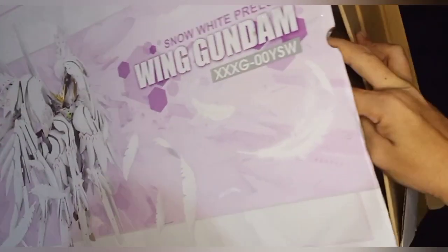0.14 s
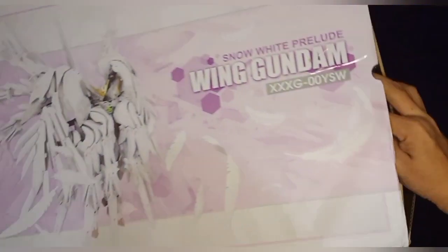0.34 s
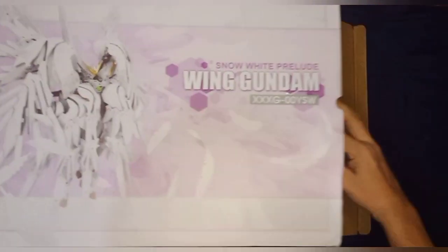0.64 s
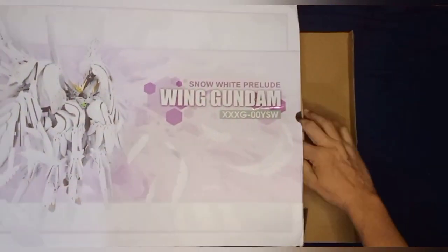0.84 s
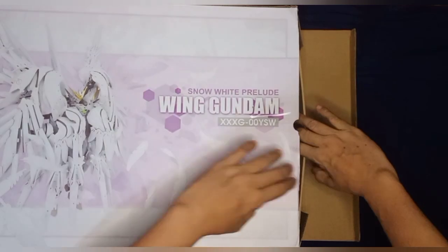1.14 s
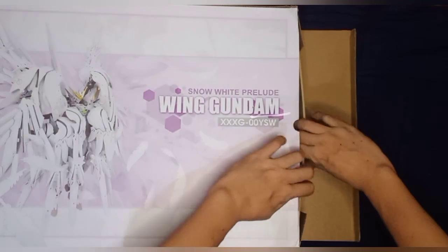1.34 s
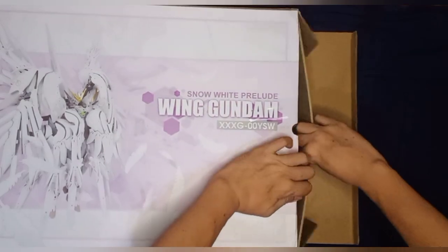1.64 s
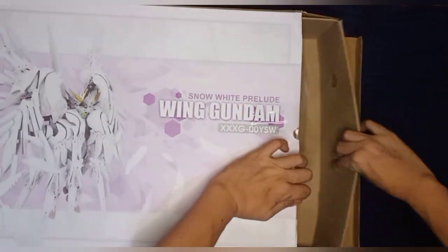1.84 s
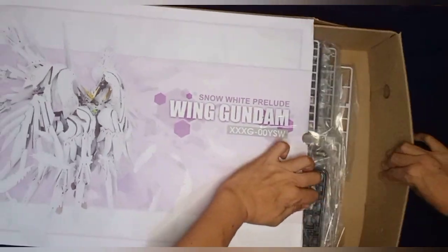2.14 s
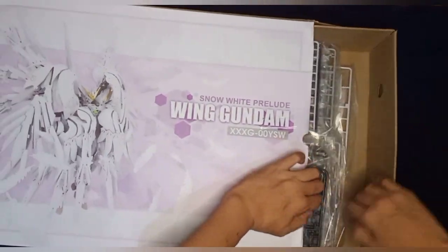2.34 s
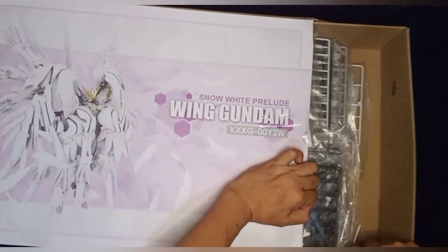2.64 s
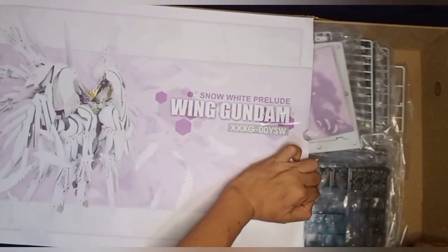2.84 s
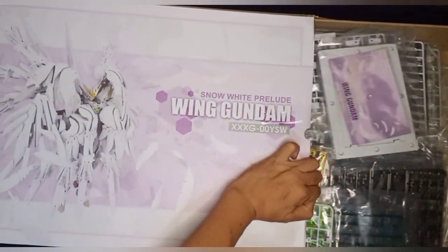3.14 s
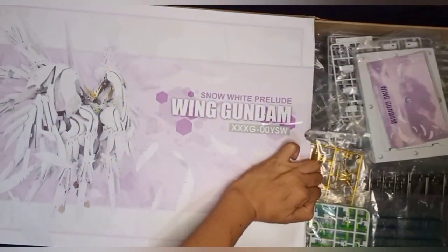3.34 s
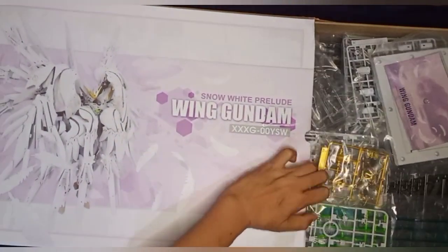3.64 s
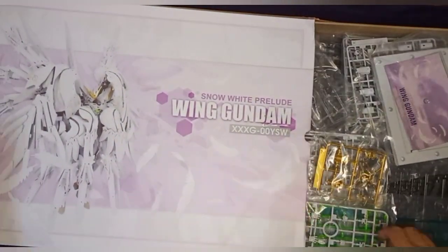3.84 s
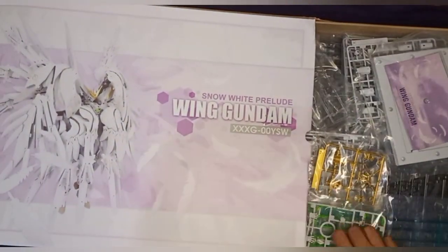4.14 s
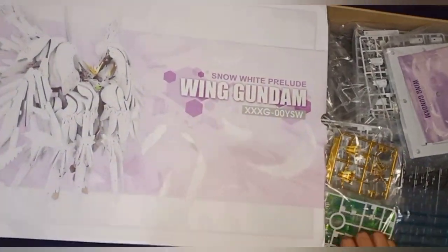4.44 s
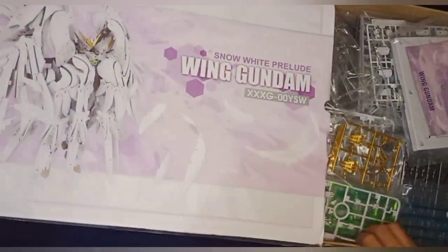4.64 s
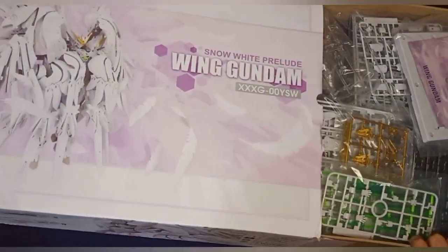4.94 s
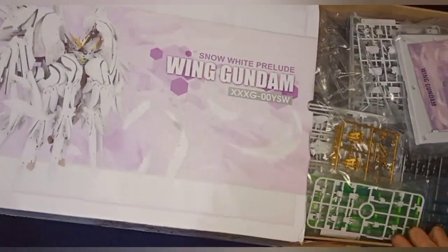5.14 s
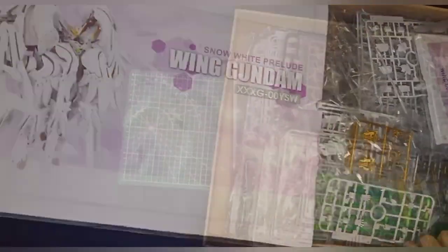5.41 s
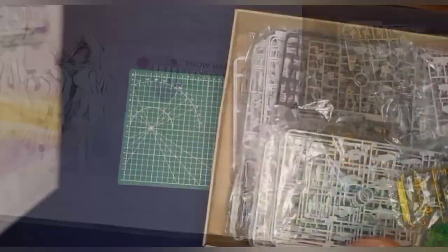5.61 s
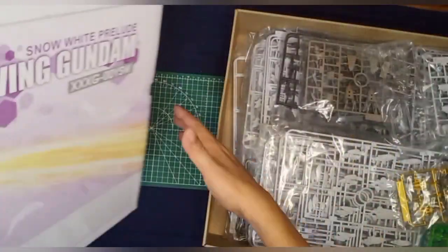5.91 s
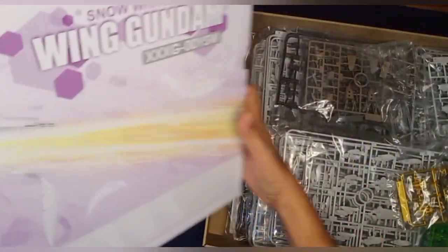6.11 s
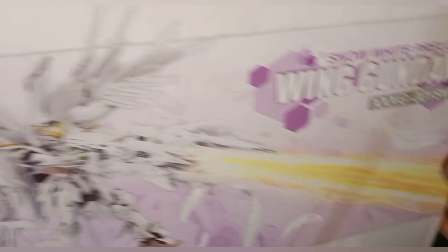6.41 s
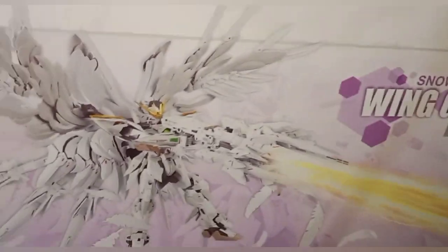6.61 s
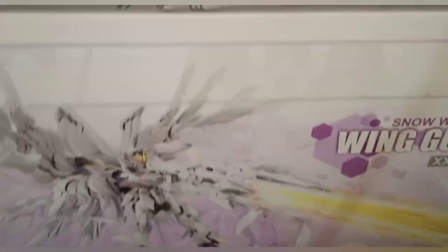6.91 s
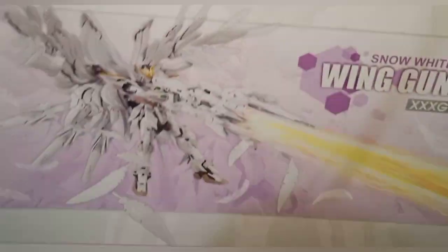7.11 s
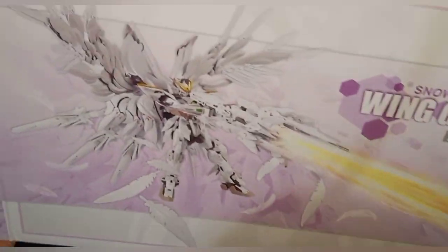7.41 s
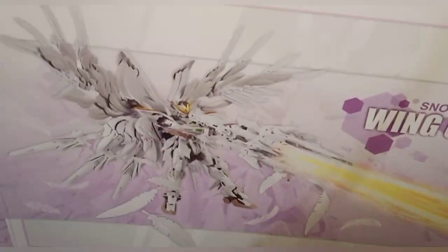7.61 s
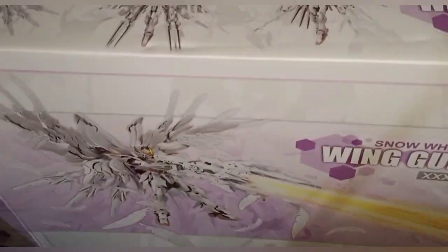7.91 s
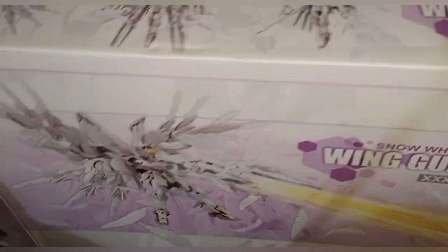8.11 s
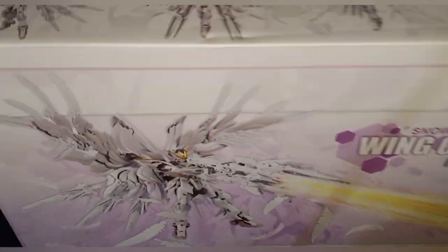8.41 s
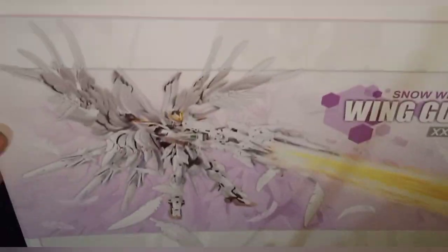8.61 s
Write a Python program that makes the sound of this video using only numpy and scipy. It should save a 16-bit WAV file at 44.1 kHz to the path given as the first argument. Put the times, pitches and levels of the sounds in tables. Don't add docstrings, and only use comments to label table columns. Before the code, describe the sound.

A close, dry indoor recording with wide, airy stereo hiss and a faint low mains hum that swells with each movement. From 0 to 1.6 s fingers rub a cardboard flap in short soft strokes, with light knocks near 0.2 s, a dry tick at 0.3 and a small thump near 0.8. A long scraping slide runs from 1.6 to 2.3, strongest early; small box bumps follow, then a steadier, longer drag from 2.6 to 3.5. A sharp knock at 3.7 starts the bag handling: thin, bright crackles and snaps, densest from 4.2 to 4.9. Sparse light rustles continue to 5.8, with a dull thump at 5.6. From 6.05 the sleeve is lifted with scuffs and hollow knocks at 6.2, 6.4 and 6.8. Softer turning rubs lead to the heaviest cluster of thumps at 7.75 to 7.9, and final knocks and a thump around 8.45, then fading brushes.

```python
import sys
import numpy as np
from scipy import signal
from scipy.fft import rfft, irfft, next_fast_len
from scipy.io import wavfile
from scipy.ndimage import uniform_filter1d, map_coordinates

SR = 44100
rng = np.random.default_rng(int(sys.argv[2]) if len(sys.argv) > 2 else 0)


def transcribe(signal):
    frames = np.atleast_2d(signal).T
    limited = np.clip(frames, -1, 1)
    pcm = np.round(limited * 32767).astype(np.int16)
    wavfile.write(sys.argv[1], SR, pcm)


def gain_from_db(level_db):
    decades = np.asarray(level_db, float) / 20
    return 10 ** decades


N = 386316

# peak_s, rise_s, fall_s, hiss_db, edge_over_hiss_db
OPENING_STROKES = [(0.031, 0.064, 0.057, -49, -4.5), (0.118, 0.066, 0.12, -56, -0.5),
                   (.206, .06, 0.062, -46, 0.5), (.285, 0.21, 0.1, -64, 3), (.497, 0.0072, 0.2, -67, 4),
                   (0.654, 0.052, .15, -47.5, -8.5), (0.775, 0.056, 0.072, -57, 5.5),
                   (0.872, .02, 0.3, -60, -20), (0.946, 0.12, 0.12, -53, 0.5),
                   (1.137, 0.16, .025, -61.5, -9.5), (1.333, 0.033, 0.11, -55, -5),
                   (1.453, 0.015, 0.13, -60.5, 3.5), (1.501, .1, 0.063, -64.5, -2),
                   (1.571, 0.043, 0.047, -56, -4), (2.428, 0.042, 0.092, -57, 3.5),
                   (2.491, 0.025, 0.12, -55.5, -6), (2.545, 0.11, 0.022, -56, -6),
                   (1.055, .03, .05, -64, -2)]
# time_s, hiss_db, edge_over_hiss_db
TRAY_PULLS = [
    [(1.62, -99, 3), (1.645, -52.5, -1.5), (1.774, -39.5, -2), (1.836, -45.5, 2), (2.107, -49, 2),
     (2.123, -45, -0.5), (2.179, -58.5, 8.5), (2.25, -53, -8.5), (2.323, -100, 4)],
    [(2.56, -83.5, 5), (2.611, -46.5, -0.5), (3.073, -45, 5.5), (3.137, -47, 4), (3.289, -44, 4),
     (3.522, -54.5, 4.5), (3.576, -79, 3), (3.62, -100, 20)],
]
# peak_s, rise_s, fall_s, hiss_db, edge_over_hiss_db
BAG_STROKES = [(3.64, 0.16, 0.036, -77.5, -10), (3.655, 0.012, 0.094, -50, -29),
               (3.714, 0.1, 0.03, -49.5, -6.5), (3.999, 0.031, 0.17, -48.5, -25),
               (4.071, 0.12, 0.045, -48, -21), (4.189, 0.065, 0.26, -43.5, -15),
               (4.254, 0.14, 0.3, -43.5, -15), (4.397, 0.02, 0.04, -42, -39), (4.381, .008, .08, -47, -25),
               (4.432, 0.0086, 0.13, -48.5, -32), (4.478, 0.09, .052, -44.5, -17),
               (4.553, 0.01, 0.1, -47.5, -27), (4.53, .005, .1, -50, -30), (4.629, 0.0057, .045, -52, -42),
               (4.679, 0.01, 0.23, -41, -20), (4.655, .05, .1, -48, -35),
               (4.749, 0.11, 0.079, -41.5, -10.5), (4.862, 0.03, 0.075, -44.5, 1.5),
               (4.907, 0.031, 0.022, -48, -36), (5.168, 0.05, 0.1, -55, 3), (5.26, 0.2, .12, -59, -2),
               (5.303, 0.008, 0.12, -53.5, -12), (5.415, 0.13, 0.12, -57.5, 4),
               (5.442, 0.27, 0.13, -59.5, -4), (5.618, 0.044, 0.21, -63.5, 5.5),
               (5.677, 0.13, 0.029, -64, -2), (5.795, 0.1, 0.039, -62.5, -12), (4.595, .04, .03, -52, -15),
               (5.205, .015, .1, -58, -15), (5.742, .07, .05, -64, 0), (5.497, .05, .04, -62, -20),
               (4.82, .03, .04, -54, -20)]
# peak_s, rise_s, fall_s, hiss_db, edge_over_hiss_db
SLEEVE_STROKES = [(6.066, .006, 0.11, -60, -1), (6.106, 0.027, 0.041, -62, 3.5),
                  (6.195, 0.054, .17, -40.5, -2), (6.379, 0.03, 0.09, -58, 1),
                  (6.585, 0.06, .06, -58, -10), (6.609, 0.075, 0.16, -50, -2.5),
                  (6.731, 0.38, .085, -58.5, -3.5), (6.796, 0.025, 0.14, -47, -5),
                  (6.822, 0.044, 0.064, -41.5, -4), (6.968, 0.13, 0.39, -61.5, -21),
                  (7.084, 0.072, 0.1, -45, 0), (7.301, 0.17, 0.6, -68.5, -36), (6.145, .03, .04, -62, 3),
                  (6.335, .02, .06, -60, 2), (6.47, .015, .05, -75, 6), (6.53, .03, .08, -62, -8),
                  (6.9, .06, .06, -62, -3),
                  (7.495, 0.03, 0.13, -58.5, -0.5), (7.647, 0.09, .065, -58, -3.5),
                   (7.689, 0.028, 0.2, -48.5, -1.5), (7.731, 0.065, 0.052, -49, -11),
                   (7.792, 0.03, 0.047, -46, 1.5), (7.859, 0.068, 0.11, -59, 10),
                   (7.95, 0.28, 0.09, -57.5, -3), (7.983, 0.036, 0.057, -45, -3),
                   (8.12, 0.04, 0.14, -57, 2), (8.08, .05, .15, -58, -30), (8.334, 0.08, 0.08, -49.5, -0.5),
                   (8.29, .025, .12, -53, 2), (8.24, .1, .1, -60, -20), (8.444, 0.03, 0.05, -50, 7),
                   (8.467, .02, .13, -51, 7), (8.42, .03, .05, -60, 0), (8.541, .08, 0.17, -50, -6.5),
                   (8.758, 0.15, .1, -52, -6), (8.69, .04, .2, -57, -4), (8.6, .08, .08, -57, -5),
                   (7.45, .02, .12, -66, -6)]
# start_s, peak_db, pitch_hz, length_s
TAUT_KNOCKS = [(.001, -45.5, 331, 0.073), (.193, -43.5, 275, .06), (0.198, -37, 1786, .032),
               (0.437, -63, 794, 0.022), (1.001, -40, 311, 0.022), (1.11, -54, 384, 0.035),
               (1.33, -47.5, 410, 0.024), (1.486, -51.5, 313, 0.033), (3.695, -27.5, 331.4, 0.038),
               (3.699, -31.5, 568, 0.014), (6.164, -36.5, 397.6, 0.13), (6.183, -28.5, 432, 0.056),
               (6.185, -36, 922, 0.052), (6.46, -44, 305, 0.021), (6.601, -40.5, 666, 0.042),
               (6.769, -36.5, 415, 0.018), (7.041, -42.5, 496, 0.053), (7.369, -43.5, 428, 0.031),
               (7.836, -25, 590, 0.013), (7.837, -37.5, 1126, 0.016), (8.296, -41, 489, 0.029),
               (8.437, -35, 292, 0.12), (8.437, -29.5, 660, .095), (8.4377, -28.5, 709, .095),
               (5.388, -53.5, 480, 0.084)]
# start_s, peak_db, pitch_hz, length_s
LOOSE_KNOCKS = [(0.251, -46.5, 296, 0.025), (0.506, -53, 273, .056), (0.767, -46, 292, 0.043),
                (.934, -49, 345, .041), (1.465, -45.5, 268, 0.018), (2.344, -45, 230, 0.087),
                (8.5, -37, 259, 0.043), (4.188, -49, 334, 0.08), (4.847, -53, 418, 0.054),
                (5.157, -60, 680, 0.032), (5.607, -45, 342, 0.04), (5.63, -40, 503, 0.043),
                (6.066, -57, 274, .074), (6.224, -35.5, 356, 0.057), (6.33, -39.5, 361, 0.023),
                (6.378, -50, 500, .03), (6.792, -43, 523, 0.033), (7.498, -44, 504, 0.078),
                (7.641, -43.5, 511, 0.043), (7.679, -48.5, 810, 0.062), (7.717, -37.5, 483, 0.026),
                (7.766, -31, 277, 0.034), (7.876, -28.5, 337, 0.037), (8.442, -40, 2100, .06)]
# start_s, level_db, pitch_hz, length_s
SINGING_FOLDS = [(.09, -58, 750, .06), (.2, -56, 4000, .02), (.62, -62, 1300, .06), (3.97, -69, 3500, .05),
                 (4.04, -60, 4300, .03), (4.175, -55, 3200, .05), (4.245, -52, 2900, .04),
                 (4.255, -55, 4200, .04), (4.335, -60, 2000, .03), (4.47, -56, 2600, .02),
                 (4.627, -54, 4000, .03), (4.72, -54, 3000, .06), (5.2, -56, 4000, .035),
                 (5.3, -60, 3000, .05), (5.48, -64, 3800, .03), (6.372, -56, 1400, .03),
                 (6.462, -68, 2000, .03), (6.525, -64, 2300, .04), (6.64, -58, 560, .08),
                 (6.88, -63, 1900, .05), (7.15, -63, 800, .08), (7.44, -68, 2100, .05),
                 (7.45, -67, 2650, .07), (7.715, -56, 2700, .04), (8.442, -50, 1700, .02),
                 (8.464, -50, 1800, .025), (8.464, -54, 3200, .02), (6.176, -44, 540, .09),
                 (5.155, -56, 2200, .04), (8.5, -46, 800, .05)]
# start_s, peak_db, dull_over_peak_db, left_over_right_db
CREASE_SNAPS = [(2.3382, -61, 18, 4), (3.66, -33, -25, 8), (4.1893, -33.5, -20, -2.5),
                (4.21, -35, -24.5, 4), (4.252, -25, -21, 0), (4.379, -36.5, -20, 7),
                (4.397, -36, -32, 11.5), (4.432, -36.5, -37, 2), (4.49, -37.5, -36, 3),
                (4.529, -31.5, -32, 6.5), (4.553, -29, -42, 5.5), (4.6279, -26, -51, -1),
                (4.6765, -30, -24, 4), (4.903, -29, -43, 6), (5.157, -47, 8, -3), (5.3004, -31, -19, -4),
                (6.0708, -48.5, -3, -5), (6.6044, -31, -10, -6.5), (4.0682, -36, -30, 1),
                (4.592, -43, -25, 5), (4.6578, -42, -35, 3), (4.8165, -46, -30, 3), (4.8449, -45, -10, 1),
                (5.4969, -52, -20, 1), (6.1935, -31, -5, -2), (6.3746, -50, 0, 4), (7.0491, -46, -8, 0),
                (7.8388, -46, 0, 0), (7.8722, -45, 0, 0), (8.4439, -40, -3, 0), (8.4658, -40, -3, -1),
                (.197, -42, -5, 2), (1.4501, -54, -8, 1), (1.6427, -48, -10, 5), (7.4955, -50, -8, -1),
                (7.6846, -47, -8, -2)]
# start_s, peak_db, dull_over_peak_db, left_over_right_db
EDGE_TICKS = [
    (.2975, -30, -1, 3),
    (.497, -40, 1, 10),
    (5.203, -42, -20, 0),
]
# start_s, peak_db,
# pitch_hz, length_s
THUMPS = [(0.2, -49, 120, 0.047), (0.519, -57, 216, 0.063), (0.767, -35, 119.5, 0.06),
          (2.356, -37.5, 198, 0.035), (2.415, -36, 190, 0.03), (2.252, -47.5, 218, 0.047),
          (5.609, -31, 131, 0.052), (5.639, -41, 104, 0.04), (7.533, -48.5, 180, 0.035),
          (7.768, -23, 140.5, 0.05), (7.799, -29, 120, 0.092), (7.874, -28.5, 206.5, 0.048),
          (7.919, -39.5, 116, 0.049), (8.337, -44.5, 111, 0.06), (8.499, -24, 131, 0.045),
          (6.373, -27, 300, .018), (7.878, -30, 520, .012), (3.7, -44, 90, .06), (5.133, -55, 125, .04),
          (6.229, -32, 420, .012), (7.79, -33, 250, .025)]
# pitch_hz, level_db (per hertz)
CARD_HISS = [(880, -52), (1500, -11), (1580, -15.5), (2640, -7.5), (2910, -8), (3660, -7), (5710, -9),
             (7840, 1), (11200, -8.5), (15100, -4), (16000, -4)]
# pitch_hz, level_db (per hertz)
BAG_FILM = [(900, -42), (1600, -17), (2600, -8), (3700, -6), (5600, -9.5), (7840, 1), (11200, -8),
            (16000, -4)]
# pitch_hz, level_db (per hertz)
EDGE_SCRAPE = [(410, -16), (700, -2.5), (745, -2), (956, -2), (1390, -5.5), (2690, -4.5), (4500, -10.5),
               (5850, -44), (9900, -120)]
# pitch_hz, width_hz, level_db
PANEL_MODES = [(120, 37, -11), (290, 32.4, 3.5), (415, 110, 0.5), (672, 150, -3), (794, 240, -13.5),
               (900, 56, -12.5)]
# pitch_hz, level_db (per hertz)
ROOM_AIR = [(25, -1.5), (64, 6), (185, -11.5), (900, -33), (2500, -23), (5000, -36.5), (9500, -37),
            (16000, -37.5)]
# pitch_hz, likeness (0 to 1)
LEFT_RIGHT_LIKENESS = [(30, .7), (60, 0.93), (130, 0.94), (290, 0.95), (640, 0.52), (1400, 0.22),
                       (3000, .01)]
# pitch_hz, left_over_right_db
PORT_BALANCE = [(200, 1), (700, -1.5), (4000, .5), (9000, -0.5), (15000, 6)]
# pitch_hz, decay_s
ROOM_DECAY = [(100, 0.053), (500, 0.12), (3000, 0.068), (12000, 0.21)]

HUM_HZ, TOP_HZ = 119.3, 15950
STROKE_DROP_DB, RISE_BEND, FALL_BEND = 29, 1.05, 1.03
DRONE_DB, DRONE_GROWS = -4, 0.99
DRONE_LAG_S, PULL_DRONE_DB = .04, 1.5
QUIET_DB = -91.5
GATE_DB, GATE_STEEP = -70.5, 1
FILM_START_S, FILM_END_S, FILM_DB = 3.62, 5.13, 1
TAUT_RATTLE, LOOSE_RATTLE = 0.25, 0.57
FOLD_WIDTH = .18
CRACK_S = .004
RUSTLE_DB, RUSTLE_S = -15, .03
TICK_RUSTLE_DB, TICK_RUSTLE_S = -30, .012
MORE_GAPS_S, MORE_GAPS_DB = 5.5, 4


def unit(x):
    return x / np.sqrt(np.mean(x ** 2) + 1e-20)


def along(points, hz):
    f, value = np.transpose(points)
    return np.interp(np.log(hz + 1), np.log(f + 1), value)


def wobble(rate):
    knots = rng.standard_normal(int(N * rate / SR) + 4)
    return map_coordinates(knots, [np.arange(N) * rate / SR])


def filtered(x, response):
    m = next_fast_len(N + SR // 2)
    return irfft(rfft(x, m) * response(np.fft.rfftfreq(m, 1 / SR)), m)[..., :N]


def strokes(t):
    rows = OPENING_STROKES + BAG_STROKES + SLEEVE_STROKES
    peak, rise, fall, peak_db, edge_db = np.transpose(rows)[:, :, None]
    grid = np.arange(0, N / SR, .001)
    away = np.abs(peak - grid)
    flank = np.where(grid < peak, (away / rise) ** RISE_BEND, (away / fall) ** FALL_BEND)
    stroke_db = peak_db - STROKE_DROP_DB * flank
    stroke_db = stroke_db - GATE_STEEP * np.clip(GATE_DB - stroke_db, 0, None)

    curves = [np.transpose(p) for p in TRAY_PULLS]
    pull_db = np.array([np.interp(grid, c[0], c[1], left=-200, right=-200) for c in curves])
    pull_edge_db = np.array([np.interp(grid, c[0], c[2], left=-200, right=-200) for c in curves])
    still = 0 * grid
    hiss_db = np.vstack([stroke_db, pull_db, QUIET_DB + still])
    edge_db = np.vstack([edge_db + still, pull_edge_db, still])
    load_db = np.vstack([0 * flank, PULL_DRONE_DB + 0 * pull_db, still])

    drone_db = hiss_db + DRONE_DB + load_db + DRONE_GROWS * edge_db
    layers = hiss_db, hiss_db + edge_db, drone_db
    hiss, edge, drone = [np.sum(gain_from_db(2 * db), axis=0) for db in layers]
    keep = np.exp(-.001 / DRONE_LAG_S)
    late = signal.lfilter([1 - keep], [1, -keep], drone, zi=drone[:1])[0]
    drone = np.minimum(drone, late)
    return [np.interp(t, grid, 10 * np.log10(power)) for power in (hiss, edge, drone)]


def pair(gain, grain_db, patchy_db):
    _, frame, z = signal.stft(rng.standard_normal((2, N)), SR, nperseg=512)
    field = uniform_filter1d(rng.standard_normal(z.shape[1:]), size=3, axis=0)
    field = uniform_filter1d(field, size=9, axis=1)
    firm_db = uniform_filter1d(strokes(frame)[0], size=28)
    streaks = unit(field) * np.clip((-48 - firm_db) / 12, .2, 1)
    noise = signal.istft(z * gain_from_db(patchy_db * streaks), nperseg=512)[1][:, :N]
    noise = noise * gain_from_db(grain_db * wobble(300))

    def spread(hz):
        turn = np.arccos(np.clip(along(LEFT_RIGHT_LIKENESS, hz), -1, 1)) / 2
        return gain(hz) * np.array([np.cos(turn), np.sin(turn)])

    mid, side = filtered(noise, spread)
    return unit(np.array([mid + side, mid - side]))


def background():
    t = np.arange(N) / SR
    opening = np.clip((strokes(t)[0] + 92) / 30, 0, 1)
    phase = 2 * np.pi * HUM_HZ * t + .5 * wobble(42)
    hum_db = -75.0 + 5.5 * opening + (2.0 + 3.0 * opening) * wobble(23)
    hum = gain_from_db(hum_db) * np.sqrt(2) * np.sin(phase)
    rumble = pair(lambda hz: (hz / 90) ** 2 / (1 + (hz / 110) ** 4), grain_db=3.5, patchy_db=3.5)
    air = pair(lambda hz: gain_from_db(along(ROOM_AIR, hz)), grain_db=-4.0, patchy_db=-2.5)
    return hum + gain_from_db(-99.5 + 28.2 * opening) * rumble + gain_from_db(-81.5) * air


def thud(t, length):
    rise = 1 - np.exp(-(t / (0.003 + 0.037 * length)) ** 2)
    return rise * gain_from_db(-9 * t / length - 17.4 * (t / length) ** 2)


def knocks():
    out, t = np.zeros(N + SR), np.arange(SR // 5) / SR
    f = np.fft.rfftfreq(len(t), 1 / SR)
    for rows, share in [(TAUT_KNOCKS, TAUT_RATTLE), (LOOSE_KNOCKS, LOOSE_RATTLE)]:
        for start, db, hz, length in rows:
            colour = f * hz / np.abs(hz * hz - f * f + .6j * f * hz) / (1 + (f / (3 * hz)) ** 2)
            rattle = unit(irfft(rfft(rng.standard_normal(len(t))) * colour, len(t)))
            blow = (1 - share) * np.sin(2 * np.pi * hz * t) + 1.105 * share * rattle
            out[round(start * SR):][:len(t)] += gain_from_db(db + 5.5) * blow * thud(t, np.clip(length, .008, .1))
    return out[:N]


def room(x):
    hz, t, z = signal.stft(rng.standard_normal((2, SR // 4)), SR, nperseg=256)
    decay = gain_from_db(-60 * t / along(ROOM_DECAY, hz)[:, None])
    tail = signal.istft(z * decay, SR, nperseg=256)[1]
    late = np.pad(x, (200, 0))[None]
    return signal.fftconvolve(late, tail / np.linalg.norm(tail[0]), axes=1)[:, :N]


def panel(f):
    total = 0
    for k, (centre, width, db) in enumerate(PANEL_MODES):
        total = total + (-1) ** k * gain_from_db(db) * 1j * f * width / (centre * centre - f * f + 1j * f * width)
    return total


def rubbing():
    t = np.arange(N) / SR
    hiss_db, edge_db, drone_db = strokes(t)
    on_film = (t > FILM_START_S) & (t < FILM_END_S)
    card = pair(lambda hz: gain_from_db(along(CARD_HISS, hz)), grain_db=1.5, patchy_db=3.0)
    film = pair(lambda hz: gain_from_db(along(BAG_FILM, hz)), grain_db=2.5, patchy_db=3.0)
    scrape = pair(lambda hz: gain_from_db(along(EDGE_SCRAPE, hz)), grain_db=1.1, patchy_db=4.5)
    drone = pair(panel, grain_db=4.2, patchy_db=5.0)
    hiss = gain_from_db(hiss_db + 3.0) * np.where(on_film, gain_from_db(FILM_DB) * film, card)
    return hiss + gain_from_db(edge_db) * scrape + gain_from_db(drone_db + 1.5) * drone


def folds():
    out, t = np.zeros((2, N + SR)), np.arange(SR // 5) / SR
    f = np.fft.rfftfreq(len(t), 1 / SR)
    for start, db, hz, length in SINGING_FOLDS:
        band = f * hz / np.abs(hz * hz - f * f + 1j * FOLD_WIDTH * f * hz)
        ring = unit(irfft(rfft(rng.standard_normal((2, len(t)))) * band ** 2, len(t)))
        ring = ring * thud(t, np.clip(length, .01, .12))
        out[:, round(start * SR):][:, :len(t)] += gain_from_db(db + 3) * ring
    return out[:, :N]


def snaps():
    out, t = np.zeros((2, N + SR)), np.arange(SR // 6) / SR
    f = np.fft.rfftfreq(len(t), 1 / SR)
    dull = (f / 700) ** 2 / (1 + (f / 700) ** 2) / (1 + (f / 2500) ** 4)
    lead, size = 64, SR // 8
    rows = [(*k, RUSTLE_DB, RUSTLE_S) for k in CREASE_SNAPS]
    rows += [(*k, TICK_RUSTLE_DB, TICK_RUSTLE_S) for k in EDGE_TICKS]
    for start, db, dull_db, pan_db, rustle_db, length in rows:
        stop = 11 * (t / np.clip(length, .01, .09)) ** 4
        burst = gain_from_db(-60 * t / CRACK_S) + gain_from_db(rustle_db - 6 * t / length - stop)
        noise = np.roll(rng.standard_normal((2, len(t))) * burst, lead, axis=1)
        own = gain_from_db(3.1 * unit(uniform_filter1d(rng.standard_normal(len(f)), size=70)))
        colour = own * (gain_from_db(along(BAG_FILM, f) + 8.5) + gain_from_db(dull_db + 14.0) * dull)
        crack = irfft(rfft(noise) * colour, len(t))[:, :size]
        level = gain_from_db(db - 8.5 + pan_db * np.array([[.5], [-.5]]))
        out[:, round(start * SR) - lead:][:, :size] += level * crack
    return out[:, :N]


def thumps():
    out, t = np.zeros(N + SR), np.arange(SR // 4) / SR
    for start, db, hz, length in THUMPS:
        turn = 2 * np.pi * hz * t
        bounce = np.sin(turn) + 0.45 * np.sin(0.793 * turn) + 0.28 * np.sin(2.8 * turn)
        out[round(start * SR):][:len(t)] += gain_from_db(db - 0.5) * bounce * thud(t, np.clip(length, .01, .12))
    return out[:N]


def scene():
    blows = knocks()
    near = np.array([np.roll(blows, -4), np.roll(blows, 4)]) * gain_from_db([[-.3], [.3]])
    handling = rubbing() + folds() + snaps() + thumps()
    return background() + near + gain_from_db(-5.0) * room(blows) + handling


def open_gaps(x, share):
    hz, frame, z = signal.stft(x, SR, nperseg=1024)
    power = uniform_filter1d(np.sum(np.abs(z) ** 2, axis=0), size=4, axis=0)[2::4]
    level_db = 10 * np.log10(power + 1e-20)
    band_hz = hz[2::4]
    treble = (band_hz > 2500) & (band_hz < 12500)
    mean_db = level_db[treble].mean(axis=0)
    doubt_db = 12 * rng.standard_normal(level_db.shape)
    depth_db = uniform_filter1d(level_db - mean_db + doubt_db, size=4, axis=1)
    depth_db += .22 * np.abs(mean_db + 93)
    favour_db = 6 + MORE_GAPS_DB * (frame > MORE_GAPS_S)
    depth_db -= favour_db * np.exp(-((band_hz[:, None] - 4700) / 1500) ** 2)
    muted = treble[:, None] & (depth_db < np.quantile(depth_db[treble], share))
    gain = np.repeat(np.where(muted, .01, 1), 4, axis=0)
    gain = np.pad(gain, ((0, 1), (0, 0)), "edge")
    return signal.istft(z * gain, SR, nperseg=1024)[1][:, :N]


def roll_off(x):
    return signal.sosfilt(signal.butter(12, 16820, fs=SR, output="sos"), x)


def record(dry):
    def ports(hz):
        balance = gain_from_db(along(PORT_BALANCE, hz) * np.array([[.5], [-.5]]))
        bass_cut = hz ** 2 / (hz ** 2 + 55 ** 2)
        return balance * (hz < TOP_HZ) * bass_cut

    heard = open_gaps(filtered(dry, ports), share=.15)
    return roll_off(heard)


dry = scene()
out = record(dry)
transcribe(out)
```